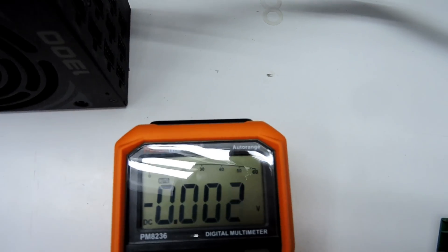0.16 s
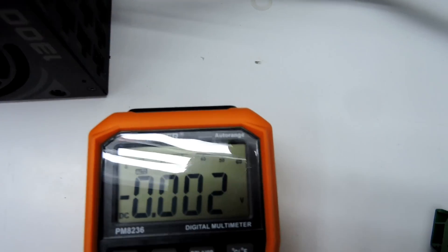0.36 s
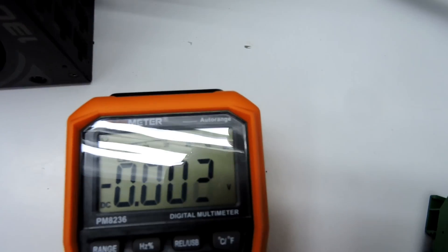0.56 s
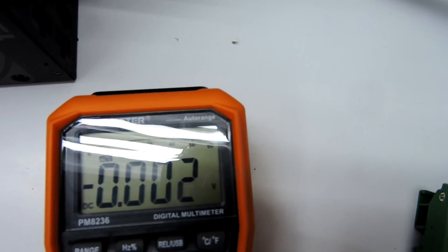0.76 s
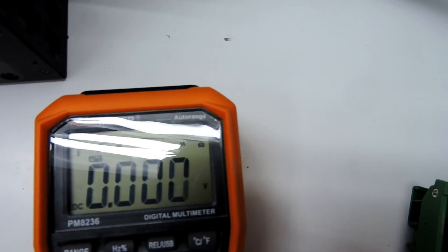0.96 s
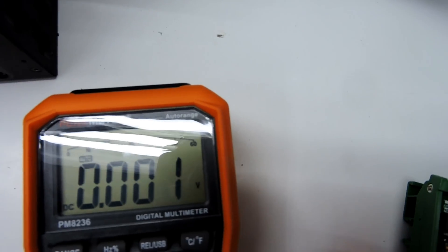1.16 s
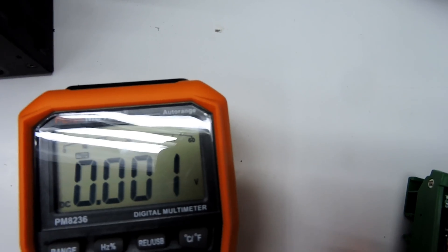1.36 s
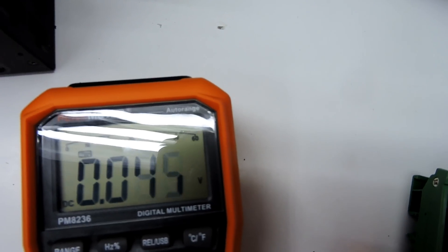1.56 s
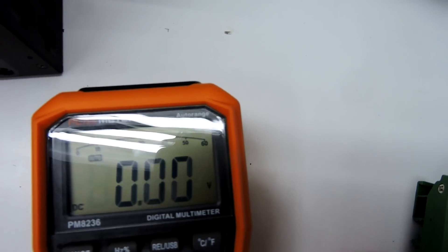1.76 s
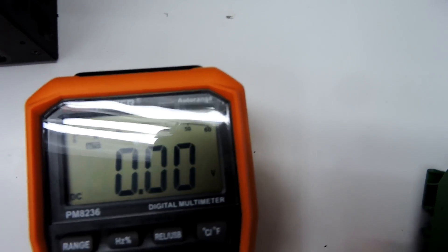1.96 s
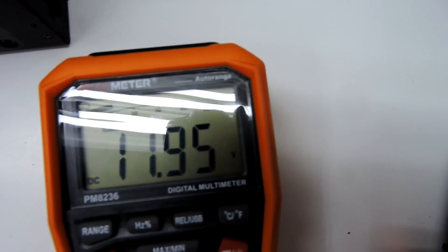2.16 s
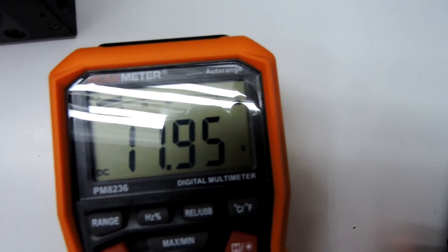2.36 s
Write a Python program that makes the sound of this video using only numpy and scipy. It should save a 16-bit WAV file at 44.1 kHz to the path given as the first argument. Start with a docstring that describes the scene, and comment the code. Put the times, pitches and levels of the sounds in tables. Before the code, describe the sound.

A small cooling fan runs steadily with wavering low hum and rushing air, plus faint handling knocks.

```python
"""On a workbench, a power supply's cooling fan runs close to a hand-held phone that drifts past it.
Motor hum, rotor throb and weaker low fan tones are wavering sines that beat under the rush of air, shaped noise.
Narrow noise bands make the ringing of the metal case and a thin hiss that changes colour.
The hand adds a few soft knocks of short decaying modes, one dull thud and two tiny noise ticks."""
import sys
import numpy as np
from scipy import signal
from scipy.fft import rfft, irfft, next_fast_len
from scipy.io import wavfile

SR = 44100
rng = np.random.default_rng(int(sys.argv[2]) if len(sys.argv) > 2 else 0)


def unload_wav(signal):
    """Save mono or channel-first audio to the path in sys.argv[1] as 16-bit WAV at rate SR, clipped to [-1, 1]."""
    wavfile.write(
        sys.argv[1],
        SR,
        np.round(np.clip(np.atleast_2d(signal).T, -1, 1) * 32767).astype(np.int16),
    )


N = 110161

# left-right balance of the air stream and of the tones: hz, left_minus_right_db
BALANCE = [(30, 2.8), (120, 1.9), (300, 1.1), (500, 3), (750, 4.1), (1200, 6.4), (1800, 2), (2500, .4),
           (6000, 1.4), (14000, 1.6)]
# nearness of the phone to the air stream: time_s, gain_db (full strength only around NEAR_HZ, half for the case)
NEARNESS = [(0, -0.8), (.55, -0.2), (.8, 1.5), (1.0, 3), (1.3, 1.86), (1.55, 0), (2.1, -1), (2.5, -0.8)]


def undb(db):
    """Decibels to gain."""
    return 10 ** (np.asarray(db) / 20)


def curve(rows, axis=1):
    """One column of a time table, at every sample."""
    rows = np.array(rows)
    return np.interp(np.arange(N) / SR, rows[:, 0], rows[:, axis])


def at(points, hz):
    """Read a spectrum on a log-frequency axis."""
    points = np.array(points)
    return np.interp(np.log(hz + 1), np.log(points[:, 0] + 1), points[:, 1])


def pan(db):
    """Left and right gains for a level difference, left above right."""
    return undb(np.array([[db], [-db]]) / 2)


def unit(x):
    """Scale to rms 1."""
    return x / np.sqrt(np.mean(x ** 2))


def noise(shape):
    """Noise whose amplitude per root Hz is shape(Hz)."""
    size = next_fast_len(N, real=True)
    hz = np.arange(size // 2 + 1) * SR / size
    spectrum = rfft(rng.standard_normal(size)) * shape(hz)
    return irfft(spectrum, size)[:N] * np.sqrt(SR / 2)


def resonance(hz, width):
    """Noise in one steep-sided resonance, rms 1; width in Hz is roughly between its half-power points."""
    return unit(noise(lambda f: 1 / (1 + ((f - hz) / (.75 * width)) ** 2)))


def walk(rate):
    """Smooth chance with spread 1, its motion mostly slower than rate (Hz)."""
    return unit(noise(lambda f: 1 / (1 + (f / rate) ** 4)))


def tone(hz):
    """A sine of rms 1 whose pitch drifts a little."""
    drift_hz = 0.27 * walk(1.07)
    turns = rng.random() + np.cumsum(hz + drift_hz) / SR
    return np.sqrt(2) * np.sin(2 * np.pi * turns)


def hum():
    """Motor hum with its octave, the rotor's throb, and weaker tones that beat against them."""
    # motor hum before trim: time_s, fundamental_db, second_harmonic_db
    motor_levels = [(0, -34, -69), (.12, -32, -53), (.25, -67, -56), (.39, -31.5, -60), (.52, -36, -47),
                    (.66, -34, -40), (.9, -33.5, -39), (1.0, -33.5, -51), (1.13, -31, -38.5),
                    (1.33, -29, -45), (1.42, -33, -48.5), (1.66, -33.5, -54), (1.82, -38.5, -41),
                    (1.95, -32.5, -40.5), (2.2, -53, -40.5), (2.33, -30, -45), (2.5, -46.5, -48)]
    # throb of the rotor: time_s, turning_rate_db, fourth_multiple_db
    rotor_levels = [(0, -52, -52), (.25, -46, -52), (.5, -34.5, -49), (.7, -40.5, -50), (.87, -34.5, -54),
                    (1.2, -45, -60), (1.36, -34, -54), (1.49, -34, -53), (1.65, -39, -57),
                    (2.35, -37.5, -62), (2.5, -40, -66)]
    # weaker steady low tones of the fan (motor harmonics, blade pass and others):
    # pitch_hz, level_db (before wavering)
    fan_tones = [(51.0, -43.5), (75.4, -48.5), (99.8, -53.5), (144.5, -52.5), (178.0, -55.5),
                 (216.0, -56.5), (237.5, -57), (288.5, -63)]
    fundamental_hz, second_hz, rotor_hz = 59.94, 118.4, 41.77
    fundamental_trim_db, second_trim_db = -.8, 0.5
    hum_pan_db, waver_db = 2, 2.5

    out = tone(fundamental_hz) * undb(curve(motor_levels) + fundamental_trim_db) * pan(hum_pan_db)
    second_gain = undb(curve(motor_levels, axis=2) + second_trim_db)
    out = out + tone(second_hz) * second_gain * pan(at(BALANCE, second_hz))
    out = out + tone(rotor_hz) * undb(curve(rotor_levels)) * pan(hum_pan_db)
    out = out + tone(4 * rotor_hz) * undb(curve(rotor_levels, axis=2))
    for hz, db in fan_tones:
        out = out + tone(hz) * undb(db + waver_db * walk(3.3)) * pan(at(BALANCE, hz))
    return out


def air():
    """Turbulence as noise in overlapping octave bands, each flickering and swelling with nearness."""
    # rush of air before trim and nearness: hz, level_db_per_hz
    air_spectrum = [(20, -60), (30, -59.5), (45, -63), (80, -61.5), (125, -63.5), (170, -63), (200, -64.3),
                    (270, -67.7), (330, -72.5), (450, -76), (720, -77), (1000, -80.5), (1700, -81.7),
                    (2600, -85.5), (4000, -91.3), (5200, -94.8), (6500, -94.7), (8200, -98), (9500, -96.5),
                    (10500, -100), (11600, -97.5), (13500, -98.5), (15500, -104)]
    # gain of the highest treble, above sheen_hz: time_s, gain_db
    sheen = [(0, -5), (.5, -3), (.9, 2), (1.6, 4), (2.0, 1), (2.5, 1)]
    trim_db, flicker_db, flicker_hz = -0.5, .5, 65
    NEAR_HZ, near_octaves, sheen_hz = 1750, 2.1, 14000

    out = 0
    for centre in 2. ** np.arange(4, 15):
        def band(f):
            # cosine flanks one octave each way, so neighbouring bands add to constant power
            octaves = np.clip(np.log2((f + 1) / centre), -1, 1)
            return undb(at(air_spectrum, f)) * np.cos(np.pi / 2 * octaves)

        ears = air_pair(band)
        near = np.exp(-.5 * (np.log2(centre / NEAR_HZ) / near_octaves) ** 2)
        out = out + ears * undb(trim_db + near * curve(NEARNESS) + flicker_db * walk(flicker_hz))
    highpass = signal.butter(6, sheen_hz, "high", fs=SR, output="sos")
    top = signal.sosfiltfilt(highpass, out)
    return out + top * (undb(curve(sheen)) - 1)


def air_pair(shape):
    """Left and right noise mixed from mid and side, with the likeness and balance of the air stream."""
    # correlation of left with right: hz, likeness (1 same, 0 unrelated)
    likeness = [(100, 0.93), (350, 0.94), (750, 0.54), (1200, 0.88), (2000, -0.03), (3500, -0.062),
                (12000, 0.35)]
    size = next_fast_len(N, real=True)
    hz = np.arange(size // 2 + 1) * SR / size
    mid, side = rfft(rng.standard_normal((2, size)))
    alike = np.clip(at(likeness, hz), -1, 1)
    sign = np.array([[1], [-1]])
    ears = mid * np.sqrt(1 + alike) + sign * side * np.sqrt(1 - alike)
    ears = ears * undb(sign * at(BALANCE, hz) / 2)
    return irfft(ears * shape(hz) * ripple(hz), size)[:, :N] * np.sqrt(SR) / 2


def ripple(hz):
    """Narrow random peaks and dips along frequency, fading out toward the bass and the treble."""
    spacing_hz, ripple_db = 70.93, 1
    knots = np.arange(1200) * spacing_hz
    depth = hz / (hz + 1000) / np.hypot(1, hz / 7000)
    return undb(ripple_db * np.interp(hz, knots, rng.standard_normal(len(knots))) * depth)


def case():
    """The air stream rings the metal case: narrow noise resonances that follow nearness at half its dB."""
    # resonances: centre_hz, width_hz, level_db (before nearness), left_minus_right_db
    case_modes = [(511.4, 21.5, -61.5, 11.5), (713, 67, -59, 11), (893, 22, -69, 14.5),
                  (1150, 32, -68, 18.5), (1747, 15, -74, -4)]
    out = 0
    for hz, width, db, side_db in case_modes:
        out = out + resonance(hz, width) * undb(db) * pan(side_db)
    return out * undb(curve(NEARNESS) / 2)


def hiss():
    """Thin, slightly grainy bands of treble noise, unrelated left and right, that come and go."""
    # bands: centre_hz, width_hz, left_minus_right_db
    hiss_bands = [(7930, 460, 4), (9010, 660, 10.5), (11560, 2000, 3), (12000, 460, -3), (13350, 300, 4.5)]
    # levels before flicker: time_s, then level_db of each band in turn
    hiss_levels = [(0, -85, -70, -60, -74, -72), (.25, -85, -68, -63, -65, -73),
                   (.45, -85, -69.5, -66, -59.5, -68), (.7, -87, -67.5, -78, -68, -61),
                   (.95, -82, -68, -86, -71, -61.5), (1.25, -73, -64.5, -76, -72, -64),
                   (1.7, -70, -63.5, -70, -80, -71), (1.95, -69, -61, -65, -80, -76),
                   (2.5, -66, -61.5, -62, -78, -76)]
    flicker_db, flicker_hz = 2, 140
    out = 0
    for k, (hz, width, side_db) in enumerate(hiss_bands):
        ears = np.array([resonance(hz, width), resonance(hz, width)])
        level_db = curve(hiss_levels, axis=k + 1) + flicker_db * walk(flicker_hz)
        out = out + ears * pan(side_db) * undb(level_db)
    return out


def knocks():
    """Soft knocks of the hand ring a few short modes, strongest near each knock's own centre."""
    # knocks: start_s, level_db, centre_hz, pitch_ratio
    knock_list = [(0.2005, -37, 450, 1), (0.2087, -27, 700, 1), (.7343, -27, 560, .9),
                  (.7392, -33, 500, .9), (1.9625, -35, 850, 1.03)]
    # modes before the pitch ratio and tilt: pitch_hz, t60_s (time to fall 60 dB), relative_db
    knock_modes = [(192, 0.025, -7), (412, 0.036, 0), (640, 0.02, -5), (860, 0.028, -2.5),
                   (1330, 0.018, -9), (1950, 0.014, -14)]
    rise_s, tilt_db_per_octave, pan_db = .0005, 2, 5.5  # rise: softness of the contact
    t, out = np.arange(N) / SR, 0
    for start, db, centre_hz, pitch in knock_list:
        age = np.maximum(t - start, 0)
        for hz, t60, mode_db in knock_modes:
            envelope = (1 - np.exp(-age / rise_s)) * np.exp(-np.log(1000) * age / t60)
            gain = undb(db + mode_db - tilt_db_per_octave * abs(np.log2(hz / centre_hz)))
            ring = np.sin(2 * np.pi * hz * pitch * age)
            out = out - ring * envelope * gain * pan(pan_db)
    return out


def thud():
    """A soft bump of the hand: one smooth push of pressure, equal in both ears."""
    centre_s, level_db, width_s = .2528, -28, .0014
    t = np.arange(N) / SR
    return -undb(level_db) * np.exp(-((t - centre_s) / width_s) ** 2)


def ticks():
    """Tiny plastic ticks: bright scrapes of noise lasting a few milliseconds."""
    # ticks: start_s, level_db (at the envelope's peak), left_minus_right_db, decay_s, lower_edge_hz
    tick_list = [(.3089, -39.5, 0.5, .0011, 4000), (1.3009, -37.5, -1.5, .0026, 900)]
    # colour before the lower edge and levelling: hz, relative_db_per_hz
    tick_colour = [(300, -4), (800, 3), (1150, 20), (1700, 2), (5000, -12.5), (7500, -2.5), (8300, -13),
                   (9100, -0.5), (10000, -9), (11000, -1.5), (12000, 4), (13200, -11), (15500, -20)]
    rise_s = 0.00048
    t, out = np.arange(N) / SR, 0
    for start, db, side_db, decay, edge_hz in tick_list:
        age = np.maximum(t - start, 0)
        envelope = (1 - np.exp(-age / rise_s)) * np.exp(-age / decay)
        scrape = unit(noise(lambda f: undb(at(tick_colour, f)) * f ** 2 / (f ** 2 + edge_hz ** 2)))
        out = out + scrape * envelope / envelope.max() * undb(db) * pan(side_db)
    return out


def scene():
    """Fan and hand together."""
    return hum() + air() + case() + hiss() + knocks() + thud() + ticks()


def record(dry):
    """The phone's right microphone loses the deep bass sooner than the left; both cut the top steeply."""
    bass_edge_hz, top_hz = 31.6, 15700
    highpass = signal.butter(1, bass_edge_hz, "high", fs=SR, output="sos")
    right = signal.sosfilt(highpass, dry[1])
    lowpass = signal.ellip(12, .2, 80, top_hz, fs=SR, output="sos")
    return signal.sosfilt(lowpass, np.array([dry[0], right]))


dry = scene()
out = record(dry)
unload_wav(out)
```